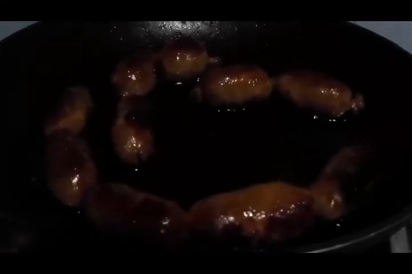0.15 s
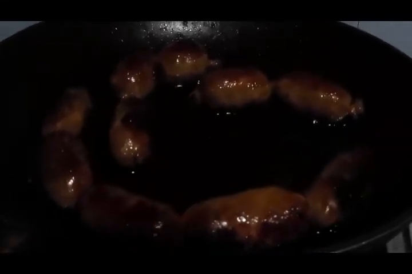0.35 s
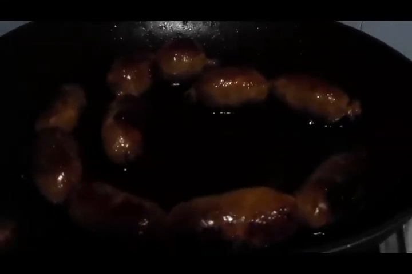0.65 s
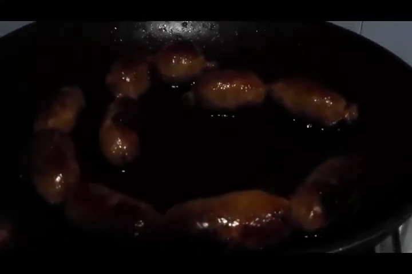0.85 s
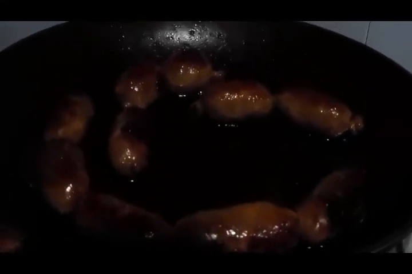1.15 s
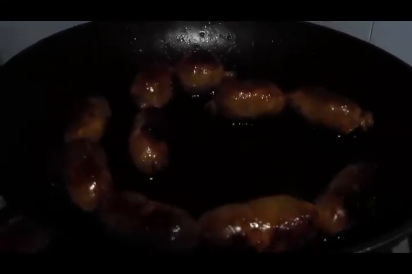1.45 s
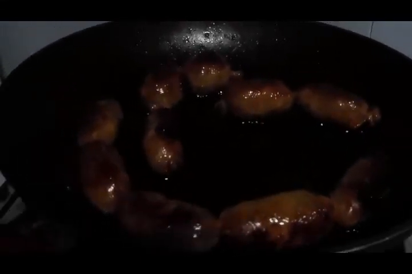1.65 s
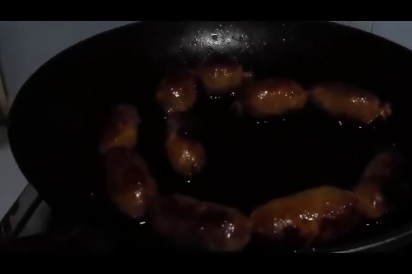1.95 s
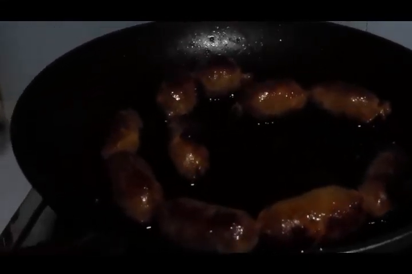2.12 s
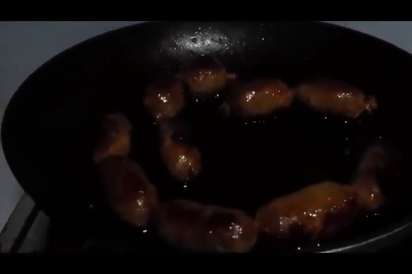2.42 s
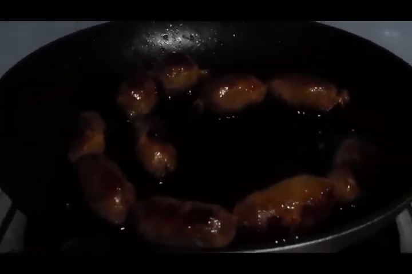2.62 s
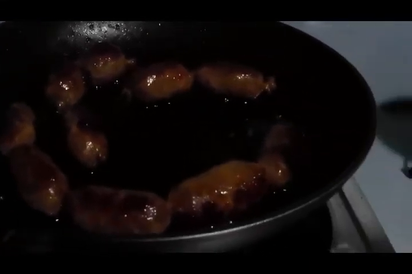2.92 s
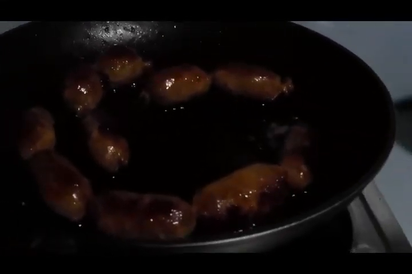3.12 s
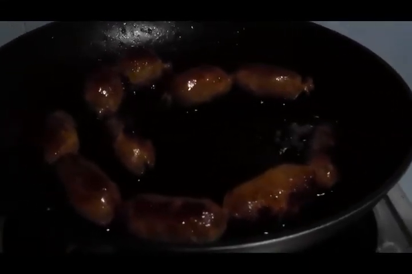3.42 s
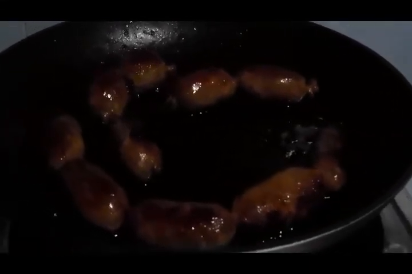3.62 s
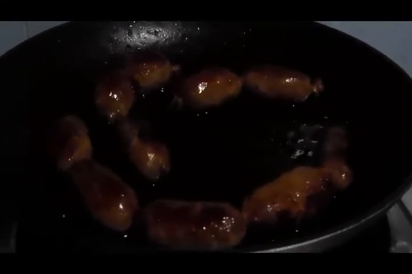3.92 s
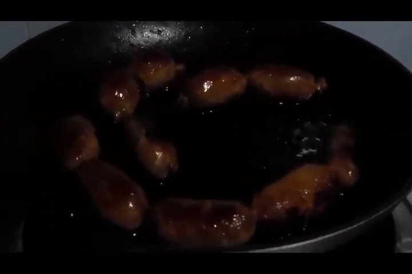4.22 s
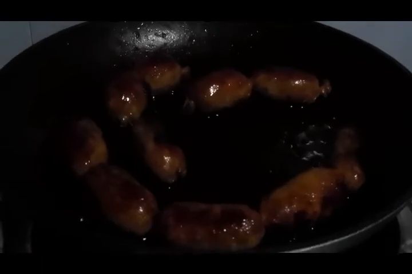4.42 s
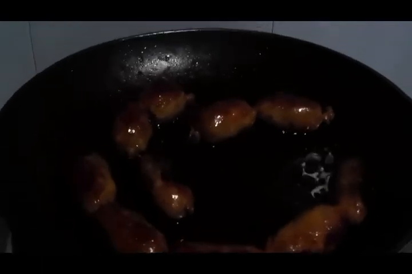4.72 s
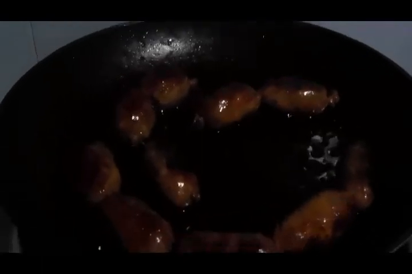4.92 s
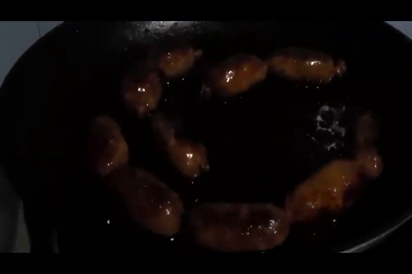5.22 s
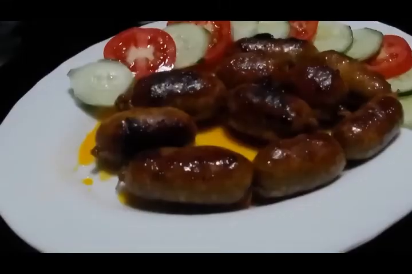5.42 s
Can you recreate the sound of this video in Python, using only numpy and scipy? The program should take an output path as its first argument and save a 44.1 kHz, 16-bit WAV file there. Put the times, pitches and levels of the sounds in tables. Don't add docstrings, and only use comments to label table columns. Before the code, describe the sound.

Sausages fry in a pan, heard from close above in a small kitchen. Sharp pops, ticks and spitting fat scatter over a dense fizz and soft steam hiss, with short reflections from pan and walls. Faint wooden scuffs and a low thud come from further off around one second. Just after five seconds the frying stops dead, leaving faint room hum and microphone hiss.

```python
import sys
import numpy as np
from scipy import signal
from scipy.fft import rfft, irfft, next_fast_len
from scipy.io import wavfile
from scipy.ndimage import map_coordinates

SR = 44100
rng = np.random.default_rng(int(sys.argv[2]) if len(sys.argv) > 2 else 0)


def gain_from_db(level_db):
    decades = np.asarray(level_db, float) / 20
    return 10 ** decades


def persist_wave(psi):
    counts = np.round(np.clip(psi, -1, 1) * 32767).astype(np.int16)
    wavfile.write(sys.argv[1], SR, np.atleast_2d(counts).T)


N = 245195
FRYING_END_S = 5.3195

# peak_s, peak_db, pitch_hz, life_ms
RINGING_POPS = [(0.0017, -32, 4800, 2.5), (0.211, -24, 5430, 2.2), (0.4343, -32.5, 5440, 2.2),
                (0.8294, -29, 5750, 1), (0.953, -31.5, 5830, 1.1), (1.4754, -26, 5060, 0.6),
                (1.678, -30.5, 4600, 1.6), (1.6809, -27.5, 4440, 0.79), (1.8094, -29, 5900, 0.98),
                (1.9239, -26.5, 4440, 0.4), (1.9278, -26.5, 7000, 0.75), (2.3166, -27.5, 4800, 0.26),
                (2.4245, -24.5, 7850, 1.2), (2.4806, -31.5, 7200, 0.93), (3.042, -32, 6800, 1.6),
                (3.1098, -25.5, 5380, 0.64), (3.269, -30.5, 4580, 1.7), (3.3122, -25.5, 6700, 1.1),
                (3.3381, -24, 5040, 1.8), (3.5022, -29.5, 6240, 2), (3.5102, -28, 4800, 0.96),
                (4.0899, -27.5, 5100, 0.71), (4.4051, -32, 5630, 1.1), (4.488, -27, 4770, 1.15),
                (4.5143, -24, 7200, 1.4), (4.52, -26.5, 6950, 0.34), (4.9822, -28.5, 4900, 2),
                (5.0577, -26, 7550, 0.78), (5.2654, -27.5, 5260, 1), (5.3134, -28.5, 6900, 0.94)]
# peak_s, peak_db, pitch_hz, snap_over_ring_db
FAT_SNAPS = [(0.454, -31.5, 2930, 1), (0.6438, -26, 7400, 6), (0.732, -31, 4500, 2), (0.868, -28, 8800, -7),
             (0.9162, -29.5, 6370, -3), (0.9856, -30.5, 4700, -4.5), (1.037, -26.5, 4540, 0.5),
             (1.0943, -26.5, 8900, -2), (1.826, -26.5, 7900, 1), (1.9799, -30, 6000, -2.5),
             (2.0888, -33.5, 2640, -1), (2.5623, -28, 9100, 4), (2.8356, -29, 5400, 5),
             (2.9016, -30.5, 6940, 6), (3.0229, -35, 6100, -1), (3.0819, -30.5, 4870, -2),
             (3.16, -30, 7900, 13), (3.237, -33.5, 5900, 15), (3.5717, -29.5, 7640, 11),
             (3.683, -34.5, 6340, 0), (3.8987, -33, 7500, 32), (4.2221, -23, 8600, 9),
             (4.2924, -29.5, 5130, 16), (4.438, -17.5, 6800, 6), (4.5796, -34.5, 4650, 13),
             (4.7534, -28.5, 4900, -1), (5.1475, -27, 7400, 0), (5.1825, -30.5, 8300, 3),
             (5.2126, -27, 5670, -2), (5.235, -23, 7340, 5)]
POP_SNAP_DB, SNAP_LIFE_MS = -31, 0.63
BURST_RISE_S = 0.0004

# start_s, peak_db, pitch_hz
TICKS = [(0.0319, -26, 8260), (0.0907, -37, 4840), (0.2008, -47, 4910), (0.3408, -28, 6140),
         (0.6715, -27, 5800), (0.7885, -26.5, 4800), (0.8439, -25.5, 5400), (1.1749, -33, 6200),
         (1.2335, -35, 6460), (1.3904, -29, 7860), (1.53, -28, 6540), (1.6319, -32, 8300),
         (1.706, -27, 5100), (1.7735, -28, 5100), (1.9368, -27, 4610), (2.274, -31, 6500),
         (2.322, -28, 7200), (2.3843, -26, 5170), (2.6589, -28, 5760), (2.9419, -27, 6400),
         (3.2, -28.5, 5770), (3.7346, -27.5, 6200), (3.7715, -28, 6000), (4.0229, -28, 7320),
         (4.1516, -27, 5900), (4.2651, -26.5, 5850), (4.5985, -29, 7260), (4.6373, -28, 5040),
         (4.7306, -28.5, 5500), (4.8476, -28.5, 6000),
         (0.3796, -30, 4170), (0.4995, -28, 4340), (0.8711, -29, 2810), (1.0846, -32, 3300),
         (1.694, -27.5, 2700), (2.0626, -27.5, 4000), (2.1036, -27.5, 4320), (2.421, -28.5, 4100),
         (2.5863, -27.5, 3210), (2.7978, -31, 2940), (3.59, -35.5, 3680), (3.7632, -27.5, 4600),
         (3.9257, -31, 4630), (4.0388, -29, 3470), (4.1021, -27, 3050), (4.3717, -32, 4400),
         (4.7739, -27.5, 3860), (4.889, -32, 2900), (4.9266, -29, 4220), (5.117, -32, 4380),
         (5.1924, -25, 4400), (0.0828, -30.5, 4900), (0.7519, -27, 4970), (1.361, -27.5, 4800),
         (2.2562, -27.5, 4550), (2.3076, -31, 6340), (2.9036, -31, 4700), (2.9591, -29, 4840),
         (5.0539, -27, 4870), (5.2184, -25.5, 5200)]
# start_s, peak_db
SPITS = [(0.0107, -30), (0.2075, -31), (0.322, -28.5), (0.6088, -25.5), (1.196, -32), (1.5594, -27),
         (2.6, -22), (2.7136, -24.5), (3.481, -29), (4.7675, -37), (4.8962, -28.5), (1.1006, -33),
         (0.64, -38), (0.8076, -31.5), (1.628, -28.5), (1.703, -30), (1.897, -33), (4.1275, -31.5),
         (4.11, -36), (2.574, -25), (3.6823, -21), (4.2985, -29), (4.4373, -43), (4.441, -27)]
SPIT_HZ, TICK_LIFE_S = 10500, 0.0008

STRAY_HZ = [4800, 5500, 6200, 6780, 7700, 9900]
STRAY_DB, STRAY_SPREAD_DB, STRAY_CYCLES = -32.5, 2.5, 3.2

# freq_hz, level_db
SKIN_TEAR = [(500, -5), (1200, -23), (2500, -4.5), (4800, -7.5), (7200, 13.5), (8600, 6), (10700, 12),
             (13000, -2), (16000, -31)]
EVEN_HZ, LEAN_HZ = 7000, 3300
FROTH_LIFE_S, FROTH_CLIMB_PER_S = 0.0009, 8

# time_s, level_db
HEAT = [(0, -50.5), (.35, -52), (.7, -52), (1.0, -53.5), (1.25, -52.5), (1.6, -51.5), (1.9, -50.5),
        (2.2, -50), (2.5, -51), (2.8, -50), (3.1, -50.5), (3.4, -51.5), (3.7, -52), (4.0, -52.5),
        (4.35, -51), (4.7, -53.5), (5.0, -51), (5.32, -54)]
# freq_hz, density_db (per Hz)
STEAM = [(600, -21.5), (1200, -8.5), (2500, -5), (3800, -7), (4800, 7), (7200, 1.5), (8600, -9),
         (10700, -0.5), (13000, -7), (16000, -30)]
SPRAY_DB, STEAM_DB = -6, -7.5

# delay_s, level_db
ECHOES = [
    (.0007, -15),
    (.0015, -18),
    (.005, -11.5),
    (.0062, -21),
    (.0078, -20),
]
# freq_hz, t60_s
ROOM_DECAY = [(1000, 0.27), (5000, 0.05), (14000, 0.076)]

# start_s, swell_s, t60_s, level_db, hardness_db (harder: more rasp, less depth)
SCUFFS = [
    (.40, .039, 0.73, -67, -2),
    (.48, 0.021, 0.56, -68.5, 10),
    (.77, 0.04, 0.43, -63.5, -2),
    (.925, 0.012, 0.27, -56, 3.5),
    (1.035, 0.018, 0.47, -52.5, -1),
    (2.555, 0.027, 0.25, -64, 5),
    (3.96, 0.019, 1, -66, 0),
    (2.07, 0.095, .9, -70, 2),
    (4.49, 0.022, 0.2, -63, 2.5),
    (4.84, .094, 0.77, -67.5, 17),
]
# start_s, level_db, pitch_hz, t60_s
KNOCKS = [
    (.94, -53, 477, 0.093),
    (0.946, -50.5, 1150, 0.16),
    (1.045, -55, 614, 0.093),
    (1.058, -39.5, 301, 0.13),
    (2.566, -43, 655, 0.04),
    (2.567, -51, 530, 0.027),
    (1.689, -50.5, 1026, 0.072),
    (3.09, -55, 319, 0.11),
    (4.092, -32.5, 1710, 0.0068),
    (4.09, -37.5, 950, 0.016),
]
# centre_hz, width_hz, level_db
DEEP = [(121, 97, -12), (185, 30, -7), (301, 48, -5.5)]
# centre_hz, width_hz, level_db
HOLLOW = [(430, 39, 3), (614, 56, -0.5), (830, 240, -6)]
# centre_hz, width_hz, level_db
RASP = [(950, 1400, 24), (1150, 100, -33), (1690, 360, -7)]
BODY_DB = [-3, 0.5, -2]
HARD_SHARE = [-2.1, 0, 0.92]
SCUFF_LOW_HZ = 111

# freq_hz, density_db (per Hz)
KITCHEN_HUM = [(18, -57), (30, -47), (54, -15.5), (75, -27), (91, -8.5), (108, -3.5), (147, -5.5),
               (232, -4), (307, -0.5), (344, -1), (590, -0.5), (779, -0.5), (1500, -6.5), (1950, -54),
               (3300, -120)]
# freq_hz, density_db (per Hz)
MIC_HISS = [(300, -15.5), (1500, -0.5), (5000, -6.5), (12000, -11.5), (16000, -5.5)]
KITCHEN_DB, HISS_DB = -69.5, -65
MIC_TOP_HZ = 15800


def pops():
    rows = [(s, db, hz, POP_SNAP_DB, ms) for s, db, hz, ms in RINGING_POPS]
    rows += [(*row, SNAP_LIFE_MS) for row in FAT_SNAPS]
    s, db, hz, snap_db, life_ms = np.transpose(rows)
    s = s - BURST_RISE_S
    ring_db = db + 4.5 - np.maximum(snap_db, 0)
    ring = bubbles(s, ring_db, hz, 0.78 * hz * life_ms / 1000, size=400)
    snap_hz = rng.normal(10580, 700, len(s))
    snap = bubbles(s, db + 6.5 + np.minimum(snap_db, 0), snap_hz, 9 * life_ms, size=200)
    froth_hz = np.where(snap_db > 0, 10800, hz)
    froth = froth_trail(s, db + 15 * np.log10(life_ms), froth_hz, count=5, drop_db=-10)
    return ring + snap + froth + skin_cracks(s, db + 4.5, np.where(snap_db > 0, 7600, hz))


def ticks():
    spits = [(s, db, SPIT_HZ * rng.normal(1, 0.04)) for s, db in SPITS]
    named = np.vstack([TICKS, spits])
    s, db, hz = np.vstack([named, strays(count=260)]).T
    is_named = np.arange(len(s)) < len(named)
    cycles = np.where(is_named, np.minimum(TICK_LIFE_S * hz, 5), STRAY_CYCLES)
    cycles = cycles * np.exp(rng.normal(0, 0.3, len(s)))
    ring = bubbles(s, db + 1.5, hz, cycles, size=200)
    froth = froth_trail(*named.T, count=4, drop_db=-5)
    return ring + froth + skin_cracks(s, db - 3.0, hz)


def strays(count):
    luck, scatter = rng.random((count, 2)), rng.standard_normal((count, 2))
    s = (np.arange(count) + luck[:, 0]) * FRYING_END_S / count
    heat_db = np.interp(s, *np.transpose(HEAT))
    size = (luck[:, 1] * len(STRAY_HZ)).astype(int)
    hz = np.take(STRAY_HZ, size) * (1 + 0.034 * scatter[:, 0])
    spread_db = STRAY_SPREAD_DB * np.clip(scatter[:, 1], -2, 1)
    return np.transpose([s, STRAY_DB + spread_db + heat_db - heat_db.mean(), hz])


def bubbles(s, db, hz, cycles, size):
    turns = np.arange(size) / SR * hz[:, None]
    life = turns / np.clip(cycles, 0.5, 30)[:, None]
    ring = np.sin(2 * np.pi * turns * (1 + 0.024 * np.minimum(life, 2)))
    wave = ring * np.exp(-life * 2) * np.minimum(turns / 0.4, 1)
    return placed(s, gain_from_db(db)[:, None] * wave)


def skin_cracks(s, db, hz):
    ragged = rng.standard_normal((len(s), 5)) * gain_from_db(-5 * np.arange(5)) * 0.35
    lean = np.clip((EVEN_HZ - hz) / LEAN_HZ, -1, 1)
    ragged[:, 0] = 1
    ragged[:, 1:4] += lean[:, None] ** np.arange(1, 4) * [1.1, 0.7, 0.3]
    ragged /= np.linalg.norm(ragged, axis=1, keepdims=True)
    clicks = placed(s, gain_from_db(db)[:, None] * ragged)
    return filtered(clicks, lambda f: gain_from_db(along(SKIN_TEAR, f)))


def froth_trail(s, db, hz, count, drop_db):
    luck = rng.random((len(s), count, 3))
    wait = 0.002 - 0.009 * np.log(1 - 0.97 * luck[..., 0])
    weaker_db = db[:, None] + drop_db - 8 * luck[..., 1]
    climb = FROTH_CLIMB_PER_S * wait * np.minimum(5000 / hz[:, None], 1) ** 2
    pitch = (hz[:, None] * (0.88 + 0.23 * luck[..., 2] + climb)).ravel()
    return bubbles((s[:, None] + wait).ravel(), weaker_db.ravel(), pitch, FROTH_LIFE_S * pitch, size=160)


def fizz(heat_db):
    seethe = crackle(count=3000, middle_hz=5600, spread=0.45, tail_db=6.5, cycles=3.4, crack_db=4.5)
    spray = crackle(count=3000, middle_hz=9930, spread=0.26, tail_db=-3.0, cycles=7.4, crack_db=-15.0)
    return gain_from_db(heat_db - 3.5) * seethe + gain_from_db(heat_db + SPRAY_DB) * spray


def crackle(count, middle_hz, spread, tail_db, cycles, crack_db):
    luck = rng.random((count, 4))
    clumps = np.cumsum(gain_from_db(5 * wobble(30)))
    s = np.interp(luck[:, 0], clumps / clumps[-1], np.arange(N) / SR)
    hz = np.clip(middle_hz * np.exp(spread * (luck[:, 1] * 2 - 1)), 500, 15000)
    db = np.minimum(-tail_db * np.log(1 - luck[:, 2]), 2.4 * tail_db)
    ring = bubbles(s, db, hz, cycles * (0.5 + luck[:, 3]), size=128)
    return unit(ring + skin_cracks(s, db + crack_db, hz))


def steam_bed(heat_db):
    swell = gain_from_db(1.8 * wobble(25))
    return gain_from_db(heat_db + STEAM_DB) * swell * noise(STEAM)


def walls(x):
    out, step = np.zeros(N + SR), SR // 30
    hz, t, z = signal.stft(rng.standard_normal((N // step + 1, SR // 6)), SR, nperseg=256)
    decay = gain_from_db(-60 * t / along(ROOM_DECAY, hz)[:, None])
    tails = signal.istft(z * decay, SR, nperseg=256)[1]
    tails[:, :round(0.003 * SR)] = 0
    for at, tail in zip(range(0, N, step), tails):
        answer = gain_from_db(-12.5) * tail / np.linalg.norm(tail)
        for s, db in ECHOES:
            delay = round(s * SR + rng.normal(0, 4))
            answer[delay:][:2] += gain_from_db(db) * np.array([0.7, 0.4])
        wet = signal.fftconvolve(x[at:at + step], answer)
        out[at:at + len(wet)] += wet
    return x + out[:N]


def wood():
    bodies = np.array([resonant(DEEP), resonant(HOLLOW), resonant(RASP)])
    out, t = np.zeros(N), np.arange(N) / SR
    for s, swell, t60, db, hard_db in SCUFFS:
        rise = np.clip((t - s) / swell, 0, 1)
        fall = gain_from_db(-60 * np.maximum(t - s - swell, 0) / t60)
        levels = gain_from_db(db + np.array(BODY_DB) + hard_db * np.array(HARD_SHARE))
        out += rise * fall * (levels @ bodies)
    for s, db, hz, t60 in KNOCKS:
        since = np.maximum(t - s, 0)
        onset = 1 - np.exp(-since / (0.081 * t60))
        out += gain_from_db(db - 60 * since / t60) * onset * np.sin(2 * np.pi * hz * since)
    return filtered(out, lambda f: f ** 4 / (f ** 4 + SCUFF_LOW_HZ ** 4))


def kitchen(is_frying):
    return gain_from_db(KITCHEN_DB + 1.5 + 0.6 * wobble(2.8) - 1.2 * ~is_frying) * noise(KITCHEN_HUM)


def unit(x):
    return x / np.sqrt(np.mean(x ** 2) + 1e-20)


def along(points, hz):
    f, v = np.transpose(points)
    return np.interp(np.log(hz + 1), np.log(f + 1), v)


def wobble(rate):
    knots = rng.standard_normal(int(N * rate / SR) + 4)
    return map_coordinates(knots, [np.arange(N) * rate / SR])


def placed(s, waves):
    size = waves.shape[1]
    at = np.round(s * SR).astype(int)[:, None] + np.arange(size)
    return np.bincount(at.ravel(), waves.ravel(), N + size)[:N]


def filtered(x, response):
    m = next_fast_len(N + SR // 2)
    return irfft(rfft(x, m) * response(np.fft.rfftfreq(m, 1 / SR)), m)[..., :N]


def noise(spectrum):
    return unit(filtered(rng.standard_normal(N), lambda hz: gain_from_db(along(spectrum, hz))))


def resonant(modes):
    def body(f):
        total = 0
        for k, (centre, width, db) in enumerate(modes):
            damping = 1j * f * width
            total = total + (-1) ** k * gain_from_db(db) * damping / (centre ** 2 - f ** 2 + damping)
        return total
    return unit(filtered(rng.standard_normal(N), body))


def scene():
    t = np.arange(N) / SR
    heat_db = np.interp(t, *np.transpose(HEAT))
    bursts = pops() + ticks() + fizz(heat_db)
    bursts = filtered(bursts, lambda hz: hz ** 2 / (hz ** 2 + 900 ** 2))
    frying = walls(bursts) + steam_bed(heat_db) + wood()
    is_frying = np.arange(N) < FRYING_END_S * SR
    hiss = gain_from_db(HISS_DB) * noise(MIC_HISS)
    return (frying * is_frying + kitchen(is_frying) + hiss)[None]


def band_limit(x):
    return signal.sosfilt(signal.butter(12, 16550, fs=SR, output="sos"), x)


def record(dry):
    def mic(hz):
        return np.where(hz < MIC_TOP_HZ, 1, gain_from_db(-31)) / np.sqrt(1 + (hz / 13500) ** 8)
    mix = filtered(dry, mic)
    return band_limit(mix)


dry = scene()
out = record(dry)
persist_wave(out)
```